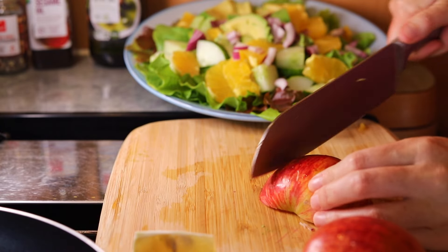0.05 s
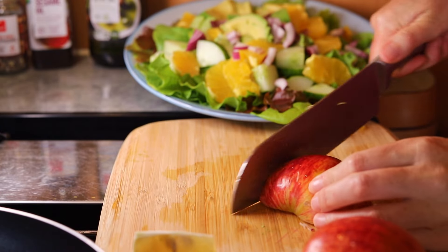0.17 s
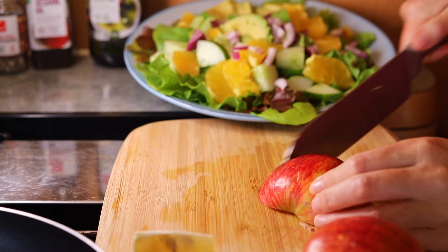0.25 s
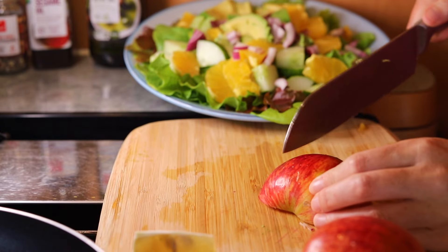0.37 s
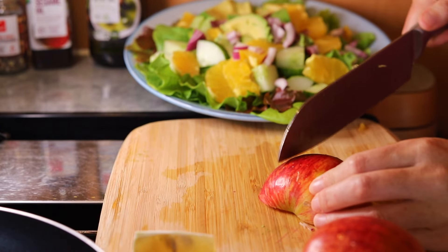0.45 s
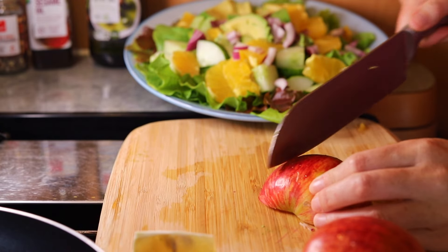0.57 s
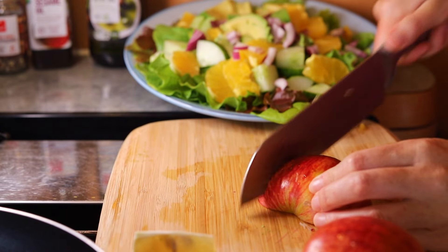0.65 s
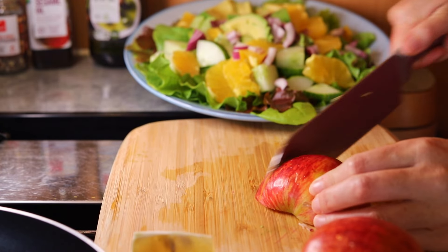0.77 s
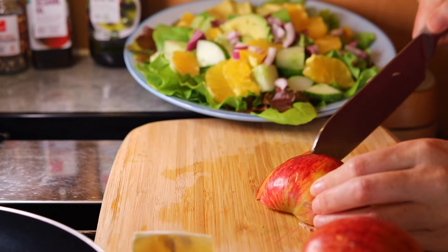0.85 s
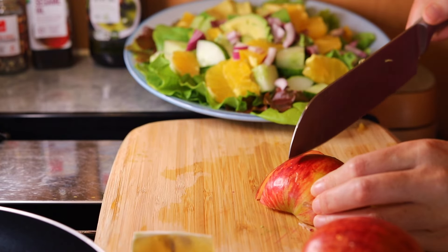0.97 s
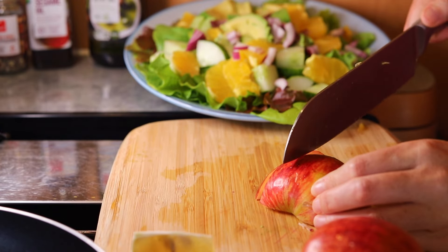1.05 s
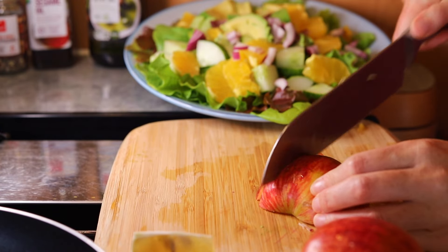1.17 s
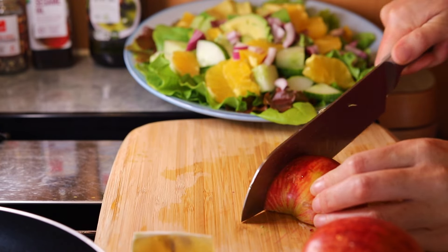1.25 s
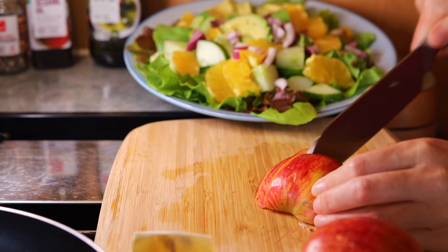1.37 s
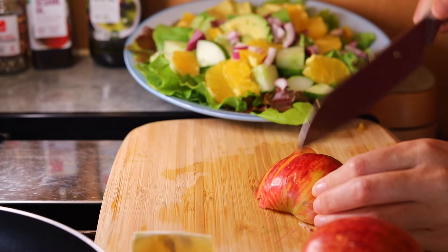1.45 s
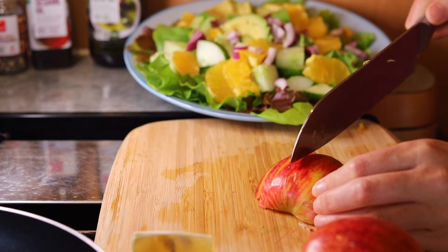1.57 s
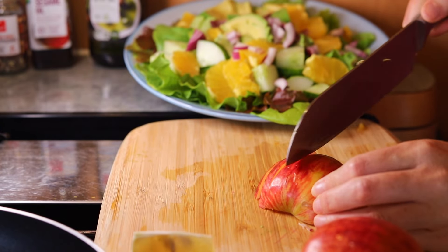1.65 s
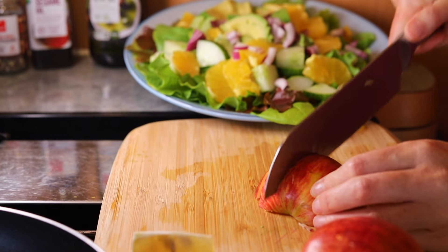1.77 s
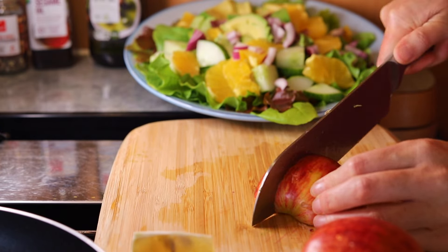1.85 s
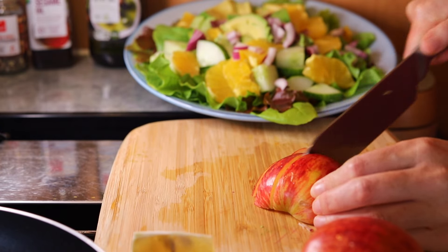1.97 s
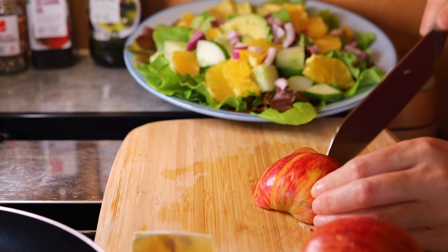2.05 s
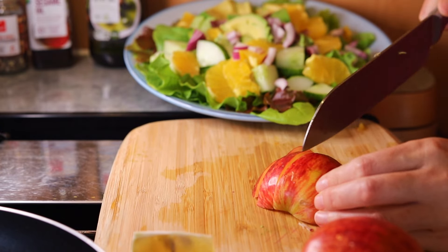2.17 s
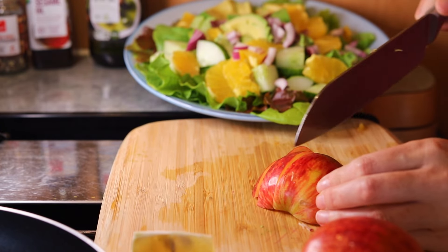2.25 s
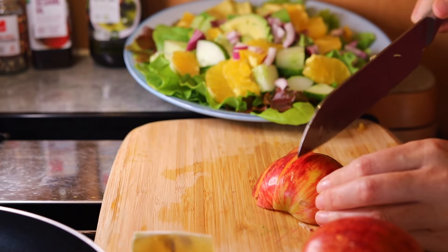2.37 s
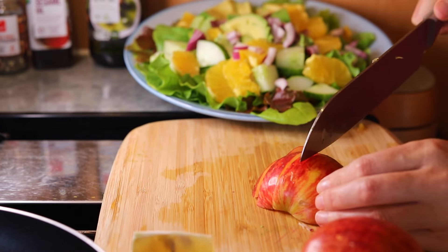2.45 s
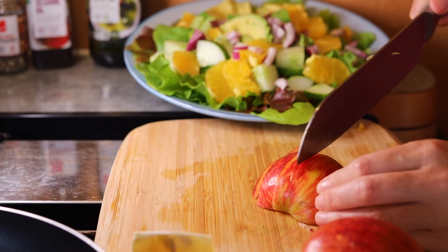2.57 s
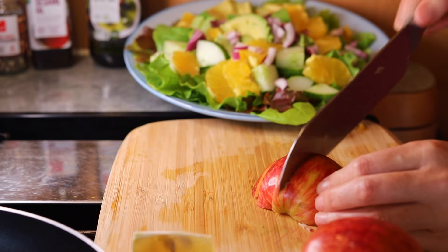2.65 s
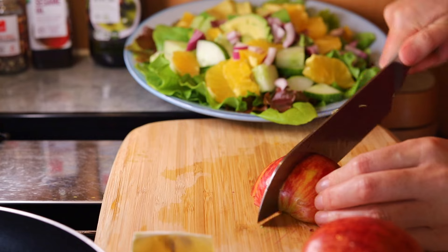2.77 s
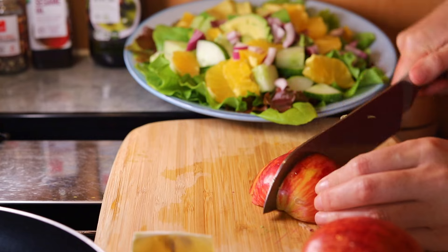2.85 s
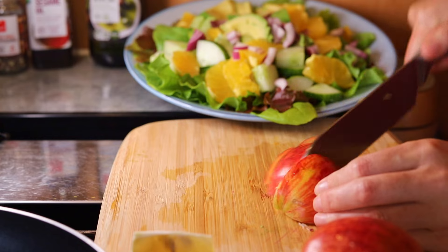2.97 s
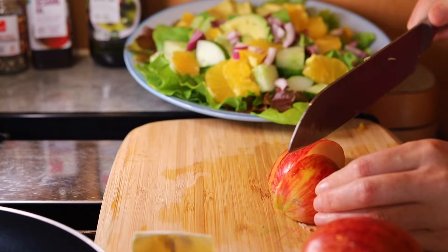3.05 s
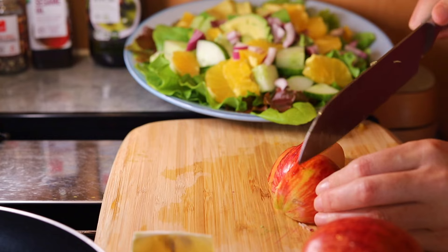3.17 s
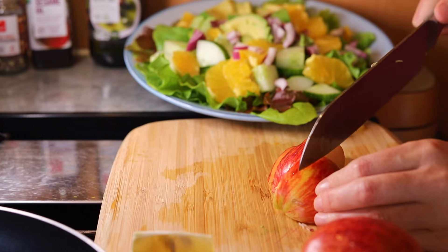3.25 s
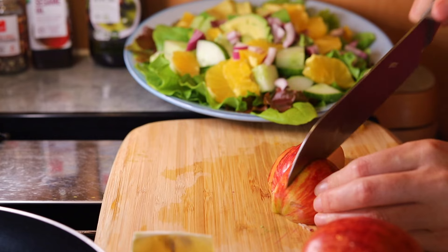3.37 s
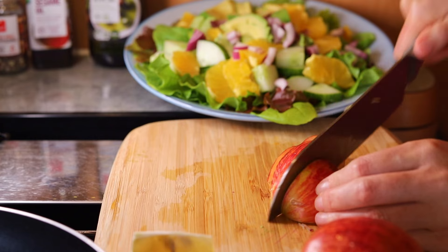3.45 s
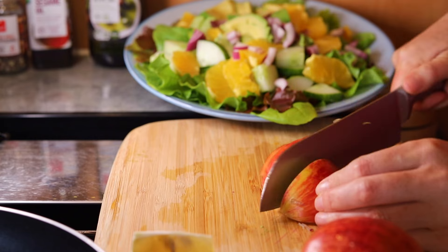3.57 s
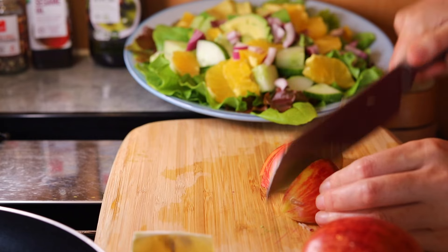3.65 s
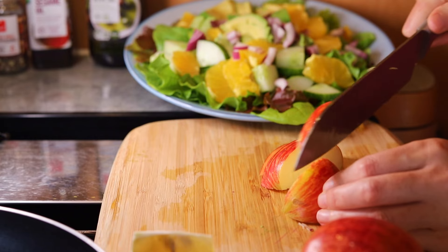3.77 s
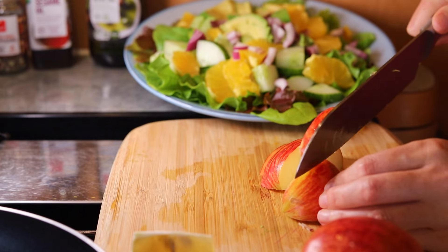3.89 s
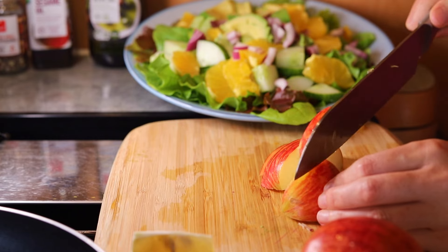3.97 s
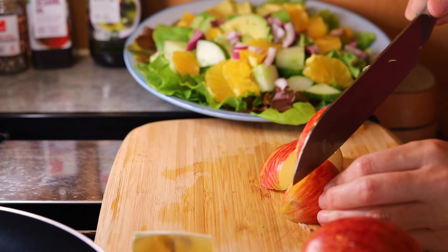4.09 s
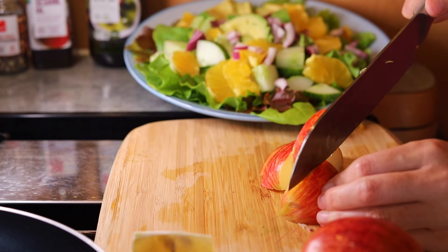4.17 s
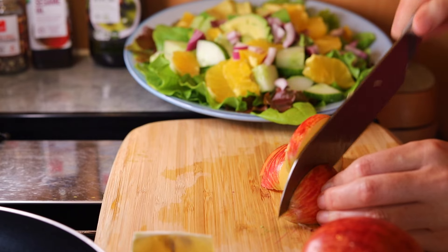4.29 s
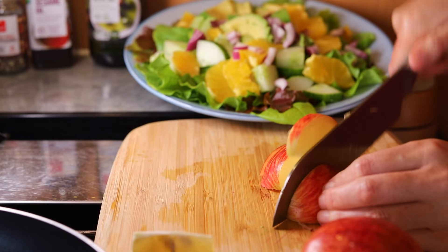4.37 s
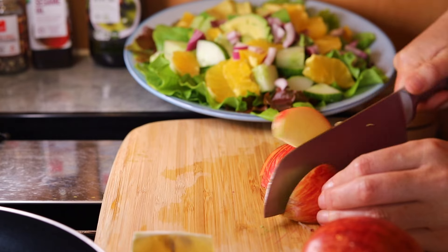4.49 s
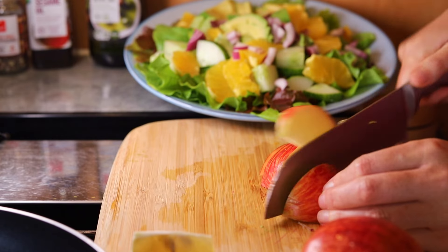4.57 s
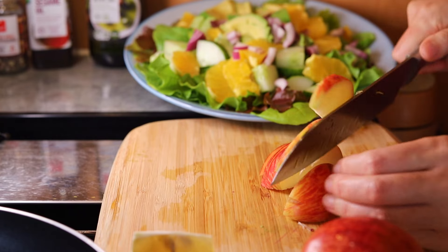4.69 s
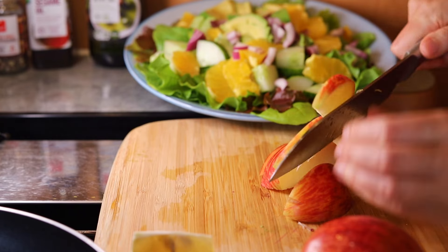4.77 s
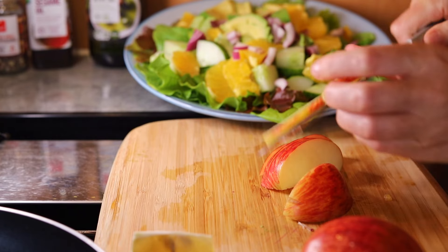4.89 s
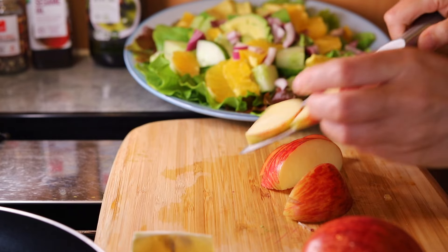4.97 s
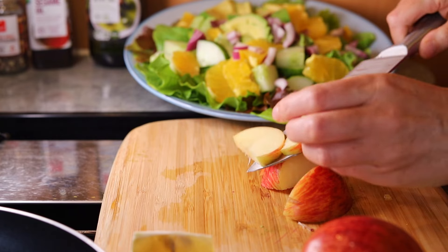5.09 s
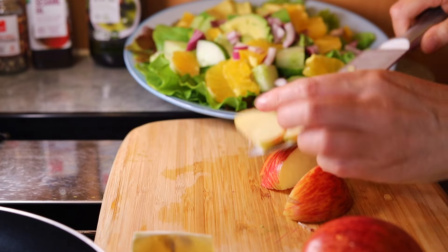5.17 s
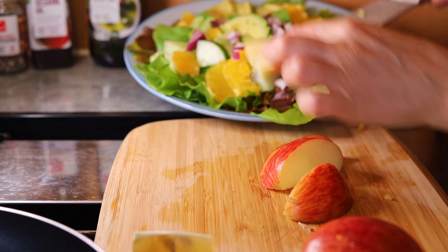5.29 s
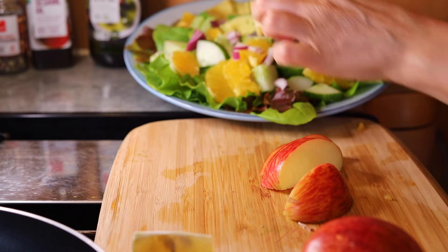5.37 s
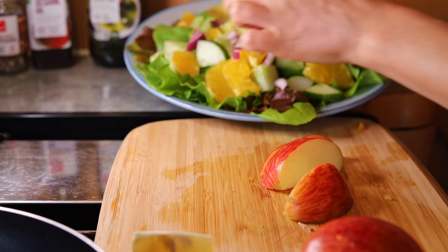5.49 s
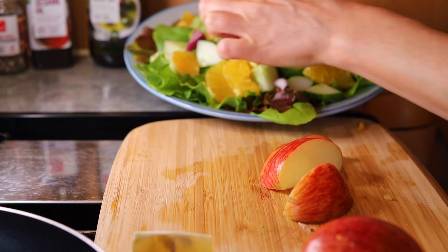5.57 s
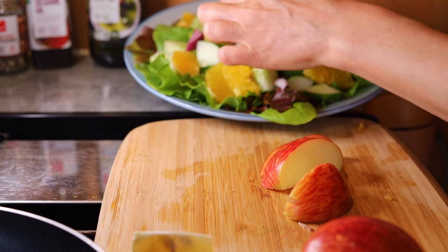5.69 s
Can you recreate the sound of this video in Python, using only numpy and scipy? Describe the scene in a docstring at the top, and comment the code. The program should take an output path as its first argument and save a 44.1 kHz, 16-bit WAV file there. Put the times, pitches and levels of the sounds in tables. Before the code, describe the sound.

A knife cuts an apple into wedges on a wooden board in a small kitchen, heard close up in stereo. Seven unhurried strokes each begin with a short, juicy crunch and end in a sharp wooden knock. The blade then scrapes back, sometimes squeaking in the skin. Light taps fall between the cuts, the steel rings faintly twice, and one last tap ends it over a low hum and hiss.

```python
"""A knife cuts an apple into wedges on a wooden board: seven close strokes in a small kitchen, in stereo.
First there is only a low hum and hiss. Then the blade crunches down, bursting cells and tearing skin,
and knocks on the board; the counter rumbles and the room answers. Next it is pulled back, scraping the
wood and sometimes squeaking in the skin. Between strokes it taps the fruit, and twice it rings faintly.
One last light tap ends the scene."""
import sys
import numpy as np
from scipy import signal
from scipy.fft import rfft, irfft, next_fast_len
from scipy.io import wavfile
from scipy.ndimage import map_coordinates

SR = 44100
rng = np.random.default_rng(int(sys.argv[2]) if len(sys.argv) > 2 else 0)


def waveform_to_disk(signal):
    """Save audio, clipped to [-1, 1], as 16-bit WAV at the path in sys.argv[1]."""
    frames = np.transpose(np.atleast_2d(signal))
    scaled = np.clip(frames, -1, 1) * 32767
    samples = np.round(scaled).astype(np.int16)
    wavfile.write(sys.argv[1], SR, samples)


N = 252693


def amp(db):
    """Turn decibels into a gain."""
    return 10 ** (np.asarray(db) / 20)


def unit(x):
    """Scale a sound to an average (rms) strength of 1."""
    return x / np.sqrt(np.mean(x ** 2) + 1e-20)


def along(points, hz):
    """Read between a table's rows on a log pitch scale."""
    pitches, values = np.transpose(points)
    return np.interp(np.log(hz + 1), np.log(pitches), values)


def pan(db):
    """Two gains that put the left db above the right."""
    return amp(np.array([[db], [-db]]) / 2)


def add(track, s, sound):
    """Mix a sound into a track at s seconds."""
    part = track[..., round(s * SR):][..., :sound.shape[-1]]
    part += sound[..., :part.shape[-1]]


def filtered(x, response):
    """Turn each pitch up or down by response(hz)."""
    size = next_fast_len(N + 8192)
    return irfft(rfft(x, size) * response(np.fft.rfftfreq(size, 1 / SR)), size)[..., :N]


def wobble(rate):
    """A smooth curve through rate random points a second."""
    return map_coordinates(rng.standard_normal(int(N * rate / SR) + 4), [np.arange(N) * rate / SR])


def grains(rate, spread_db):
    """Two streams of tiny random snaps, rate a second."""
    snaps = (rng.random((2, N)) < rate / SR) * rng.standard_normal((2, N))
    return snaps * amp(spread_db * rng.standard_normal((2, N)))


# how alike left and right are: (pitch [Hz], likeness [1 = the same])
LIKENESS = [(60, .97), (700, .88), (1500, .55), (3000, .1), (5000, -.1), (15000, -.1)]
def stereo(pair, colour):
    """Blend two unrelated sounds into a left and right that are alike in the bass."""
    def blend(hz):
        turn = np.arccos(np.clip(along(LIKENESS, hz), -1, 1)) / 2
        return colour(hz) * np.array([np.cos(turn), np.sin(turn)])
    mid, side = filtered(pair, blend)
    return unit(np.array([mid + side, mid - side]))


def noise(tone):
    """Stereo noise shaped by a tone table."""
    return stereo(rng.standard_normal((2, N)), lambda hz: amp(along(tone, hz)))


def envelope(start, end, rise, slope, fall):
    """A gain that rises until start, drifts until end, then falls (all in dB per second)."""
    knee_s = 0.0046  # the hand never changes pace at once
    gain = np.zeros(N)
    near = np.arange(max(round(start * SR) - SR // 4, 0), min(round(end * SR) + SR // 4, N))
    t = near / SR
    past = lambda x: knee_s * np.logaddexp(0, x / knee_s)
    drift_db = slope * (np.clip(t, start, end) - start)
    gain[near] = amp(drift_db - rise * past(start - t) - fall * past(t - end))
    return gain


# the quiet kitchen's hiss: (pitch [Hz], relative level [dB])
HISS_TONE = [(20, -20.5), (45, -14), (70, -5.5), (100, -13.5), (135, -21), (250, -17.5), (600, -21.5),
             (1100, -25), (1600, -23), (2000, -17), (3500, -16.5), (6800, -19.5), (10000, -25),
             (15700, -33.5)]
def background():
    """An appliance hums over a steady hiss."""
    phase = 2 * np.pi * 69.5 * np.arange(N) / SR + 0.37 * wobble(rate=4)
    hum = unit(np.sin(phase) * amp(1.1 * wobble(rate=4.1)))
    return amp(-76) * hum + amp(-68) * noise(HISS_TONE)


# the blade sinks through the apple:
# (skin splits [s], tip meets wood [s], blade stops [s], fizz [dB], skin [dB], wood [dB], surge [dB])
DOWN_STROKES = [(0.161, 0.172, .193, -47, -45, -46, 4), (0.711, 0.74, 0.74, -46.5, -46.5, -44.5, 3.5),
                (1.227, 1.276, 1.328, -49, -52, -48.5, 7.5), (1.794, 1.899, 1.915, -51, -52, -50.5, 9),
                (2.712, 2.743, 2.795, -49, -52.5, -57, 0), (3.435, 3.476, 3.521, -48, -55, -51.5, 8.5),
                (4.184, 4.186, 4.214, -62, -66.5, -70.5, 1.5),
                (4.298, 4.312, 4.389, -49.5, -53.5, -52, 10.5)]
def down_strokes():
    """Fizz, skin and wood gains going down: a bite, a crunch, a surge as the last flesh snaps."""
    t, gains = np.arange(N) / SR, np.zeros((3, N))
    surge_s, stop_db_per_s = .018, 900.5
    for bite, scrape, end, fizz_db, skin_db, wood_db, surge_db in DOWN_STROKES:
        surge = np.exp(-np.abs(t - end) / surge_s)
        fizz = envelope(bite, end, rise=400.5, slope=0, fall=stop_db_per_s)
        skin = envelope(bite, end, rise=339.5, slope=-24, fall=stop_db_per_s)  # split skin tears easily
        wood = envelope(scrape, end, rise=419, slope=89.5, fall=stop_db_per_s)  # the tip presses harder
        gains[0] += amp(fizz_db + surge_db * surge) * fizz
        gains[1] += amp(skin_db + surge_db * surge) * skin
        gains[2] += amp(wood_db + 5.5 * surge) * wood  # it digs in just before the knock
    return gains


# the juicy fizz: (pitch [Hz], relative level [dB])
FIZZ_TONE = [(100, -14.5), (400, -17.5), (900, -16), (2000, -5), (4000, 1), (6300, 0.5), (8000, -5),
             (12000, -10.5), (16000, -16.5)]
def bursting_cells():
    """The apple's cells burst in a dense fizz."""
    return stereo(grains(rate=23000, spread_db=2.5), lambda hz: amp(along(FIZZ_TONE, hz)))


# the tearing skin: (pitch [Hz], relative level [dB])
SKIN_TONE = [(100, -44.5), (500, -24.5), (900, -9.5), (1200, -3.5), (1700, -1), (2600, 2.5), (3400, -3),
             (5000, -8), (12000, -26)]
# pitches the blade boosts: (pitch [Hz], width [Hz], strength [dB])
BLADE_PEAKS = [(1180, 30, 6.7), (1450, 50, 5.3), (2010, 90, 1.3), (2496, 42, 6.5), (2720, 98, 5.1),
               (2960, 110, 4.7), (3140, 60, 12), (3600, 150, 4), (4306, 35, 15), (5530, 70, 9.6),
               (6060, 130, 9.6)]
def tearing_skin():
    """The skin tears in tiny snaps, coloured by the steel."""
    def colour(hz):
        peaks = sum(amp(2 * db) / (1 + (2 * (hz - pitch) / width) ** 2)
                    for pitch, width, db in BLADE_PEAKS)
        return amp(along(SKIN_TONE, hz)) * np.sqrt(1 + peaks)
    return stereo(grains(rate=11000, spread_db=1.07), colour)


# the kitchen's echo: (pitch [Hz], time to fade by 60 dB [s])
ECHO_FADES = [(100, 0.67), (600, 0.24), (2500, .25), (12000, 0.093)]
def room(x, delay_s):
    """The room answers with a blur of echoes; each pitch dies at its own speed."""
    hz, t, spectrum = signal.stft(rng.standard_normal((2, SR // 2)), SR, nperseg=256)
    fade = amp(-60 * t / along(ECHO_FADES, hz)[:, None])
    tail = signal.istft(spectrum * fade, SR, nperseg=256)[1]
    tail = np.pad(unit(tail) / np.sqrt(tail.shape[1]), ((0, 0), (round(delay_s * SR), 0)))
    return signal.fftconvolve(x, tail, axes=1)[:, :N]


def thinned(x, cut_hz=360):
    """Air slips round the small board, so it gives off little bass."""
    return signal.sosfilt(signal.butter(4, cut_hz, "high", fs=SR, output="sos"), x)


# the board's own notes: (pitch [Hz], time to fade by 60 dB [s], level [dB], left minus right [dB])
BOARD_NOTES = [(409.7, 0.06, -16.5, 0.5), (552, 0.13, -22, 1), (673.8, .035, 0.5, 2),
               (719.4, 0.017, 6.5, 6), (840, 0.035, -4.5, -5), (955, 0.028, -18.5, 3),
               (1114, 0.01, -17, -0.5), (1201, .04, -11, -1.5), (1405, 0.0074, -9.5, 0.5),
               (1522, 0.044, -10.5, -3), (1746, 0.054, -24, -5.5), (2074, .02, -10, -15),
               (2270, 0.03, -14.5, -6.5), (2690, .018, -16.5, -4), (3160, 0.045, -19.5, -0.5)]
def board(force, vary_db=0):
    """A push makes the board ring; where it lands changes how strong the high notes are."""
    t = np.arange(SR // 6) / SR
    ring = np.zeros((2, len(t)))
    for hz, fade_s, db, side in BOARD_NOTES:
        spot_db = vary_db * np.clip(hz / 800 - 1, 0, 1) * rng.standard_normal()
        swell = 1 - np.exp(-t / (0.0022 * (650 / hz) ** 2))  # slow, low waves fill the board later
        ring += pan(side) * amp(db + spot_db - 60 * t / fade_s) * swell * np.sin(2 * np.pi * hz * t)
    return signal.fftconvolve(force[None], thinned(ring), axes=1)[:, :N]


def scraping_wood(slip_hz=720):
    """The edge sticks and slips unevenly, at a rate near the board's main notes."""
    cycles = np.floor(np.cumsum(slip_hz * amp(2.3 * wobble(rate=600))) / SR)
    slips = np.diff(cycles, prepend=0) * amp(2.2 * wobble(rate=400))
    soft_slips = filtered(slips, lambda hz: 1 / (1 + (hz / 1100) ** 4))
    return unit(board(soft_slips))


# the crack of a knock: (pitch [Hz], relative level [dB])
CRACK_TONE = [(60, -46), (250, -28.5), (450, -12), (900, 8.5), (1500, 7), (2600, 0), (4000, -11.5),
              (7000, -18.5), (16000, -37)]
# the tip lands, the edge slaps down, the knife rocks:
# (time [s], tip [dB], tip hardness [Hz], edge delay [s], edge [dB], edge hardness [Hz], rocking [dB])
KNOCKS = [(0.1939, -24.5, 2200, .0033, -17, 1700, -17.5), (0.7522, -14, 3100, .0017, -18, 1840, -39),
          (1.3221, -22, 2402, .0017, -17, 1200, -35), (1.9044, -28.5, 1800, .0017, -16, 1500, -24),
          (1.9672, -29, 2150, 0.003, -10, 770, -46), (2.7890, -20.5, 1200, 0.005, -16.5, 1500, -27),
          (2.8722, -12.5, 3526, 0.0018, -20.5, 2030, -47), (3.5259, -21, 2320, .0034, -11, 1003, -54),
          (4.3952, -36.5, 2500, 0.0033, -9, 778, -48)]
def knocks():
    """Each contact is a short push on the board; harder ones are shorter and crack more."""
    wood, crack, t = np.zeros((2, N)), np.zeros(N), np.arange(SR // 8) / SR
    for start, tip_db, tip_hz, lag, edge_db, edge_hz, rock_db in KNOCKS:
        contacts = [(start - .0045, -31.5, 2200),  # a light graze comes first
                    (start, tip_db, tip_hz),
                    (start + lag, edge_db, edge_hz),
                    (start + lag + .009, rock_db, 1000)]
        for s, db, hard_hz in contacts:
            age = 2 * np.pi * hard_hz * t
            push = age * np.exp(-age)
            add(wood, s, board(amp(db) * push / push.sum(), vary_db=2))
            add(crack, s, amp(db) * hard_hz / 2500 * amp(-60 * t / 0.027))
    return amp(-2) * wood + amp(-11.5) * thinned(crack * noise(CRACK_TONE)) * pan(-3)


# the counter's rumble: (pitch [Hz], relative level [dB])
RUMBLE_TONE = [(25, -8), (60, -2.5), (100, -1.5), (160, -4.5), (300, 0.5), (450, -2), (800, -13),
               (3000, -41)]
def counter_rumble(blows):
    """The counter rumbles briefly under every blow."""
    linger = 0.015 * SR
    jolt = np.sqrt(signal.lfilter([1], [1, -np.exp(-1 / linger)], blows[0] ** 2) / linger)
    return jolt * noise(RUMBLE_TONE)


# the blade is pulled along the cut: (start [s], lifts out [s], fizz [dB], skin [dB], wood [dB])
BACK_STROKES = [(0.259, 0.361, -50, -47, -44), (0.804, 0.91, -50, -48.5, -46.5),
                (1.363, 1.463, -50, -47.5, -49), (1.975, 2.105, -52.5, -50.5, -52),
                (2.82, 2.841, -55, -55.5, -46), (2.888, 2.924, -55.5, -55, -51.5),
                (3.002, 3.046, -57, -50, -50.5), (3.554, 3.624, -51, -52.5, -52),
                (4.429, 4.49, -43.5, -48.5, -46)]
def back_strokes():
    """Fizz, skin and wood gains going back: less steel in the fruit, more scraping on the wood."""
    gains = np.zeros((3, N))
    grab_db_per_s = 849.5
    for start, end, fizz_db, skin_db, wood_db in BACK_STROKES:
        gains[0] += amp(fizz_db) * envelope(start, end, grab_db_per_s, slope=-55, fall=479.5)
        gains[1] += amp(skin_db) * envelope(start, end, grab_db_per_s, slope=-44.5, fall=479.5)
        gains[2] += amp(wood_db) * envelope(start, end, grab_db_per_s, slope=15, fall=620.5)
    return gains


# the edge catches the wood: (time [s], level [dB], half length [s])
CATCHES = [(0.304, -44, 0.0073), (0.346, -41, 0.005), (0.853, -39, 0.014), (0.887, -37, 0.0083),
           (1.407, -38.5, 0.011), (1.442, -38, 0.012), (1.950, -47, 0.016), (2.088, -49.5, 0.014)]
def judder():
    """Extra scraping gain each time the pulled edge catches."""
    t = np.arange(N) / SR
    return sum(amp(db) * np.exp(-((t - s) / half) ** 2) for s, db, half in CATCHES)


# steel squeaks in the skin: (time [s], pitch [Hz], relative level [dB], half length [s])
SKIN_SQUEAKS = [(0.312, 2490, -54.5, 0.018), (.825, 2480, -53, .025), (1.215, 2490, -59, .025),
                (1.803, 2480, -46.5, .014), (2.724, 2513, -53, 0.026), (4.463, 3270, -48, 0.0117),
                (4.455, 4340, -53.5, .02)]
def squeaks():
    """Sticking and slipping makes the blade sing one of its notes for a moment."""
    t, out = np.arange(N) / SR, np.zeros(N)
    drift = .8 * wobble(rate=120)
    for s, hz, db, half in SKIN_SQUEAKS:
        out += amp(db + 3.5) * np.exp(-((t - s) / half) ** 2) * np.sin(2 * np.pi * hz * t + drift)
    return out * amp(3.5 * wobble(rate=150)) * pan(-3.5)


TOP_HZ = 15830  # the highest pitch kept
# a tap's dull thud: (pitch [Hz], relative level [dB])
THUD_TONE = [(25, -17.5), (60, -6), (95, -0.5), (190, 2), (320, -11.5), (700, -20.5), (1500, -51),
             (6000, -58)]
# the blade touches the fruit or lets go of a slice:
# (time [s], tick [dB], tick pitch [Hz], time for the tick to fade by 60 dB [s], thud [dB])
TAPS = [(.432, -56, 4000, 0.065, -85), (.538, -47.5, 2110, 0.025, -57), (1.074, -62, 2540, 0.056, -62),
        (1.526, -48, 4800, 0.056, -80), (1.636, -45, 2370, 0.041, -49.5), (1.974, -39.5, 4900, 0.08, -86.5),
        (2.17, -51.5, 4900, 0.11, -100.5), (2.504, -53.5, 2180, 0.054, -55.5),
        (3.094, -50, 12150, 0.036, -85.5), (3.270, -48.5, 3380, 0.039, -55.5),
        (3.771, -51.5, 3520, 0.049, -87.5), (3.920, -57, 3610, .05, -60.5),
        (4.173, -50.5, 1990, 0.051, -73.5), (4.564, -46.5, 2540, 0.061, -80),
        (4.633, -41.5, 3040, 0.044, -76), (5.694, -48, 2490, 0.037, -80)]
def taps(thud_fade_s=.14):
    """A light touch ticks, and thuds through the fruit into the counter."""
    ticks, thud, t = np.zeros((2, N)), np.zeros(N), np.arange(SR // 2) / SR
    for s, tick_db, tick_hz, fade_s, thud_db in TAPS:
        band = signal.butter(2, [tick_hz * 0.38, min(tick_hz * 2, TOP_HZ)], "band", fs=SR, output="sos")
        tick = unit(signal.sosfilt(band, rng.standard_normal((2, len(t)))))
        add(ticks, s, amp(tick_db - 60 * t / fade_s) * (1 - np.exp(-t / 0.0043)) * tick * pan(-3))
        add(thud, s, amp(thud_db - 60 * t / thud_fade_s) * (1 - np.exp(-t / .005)))
    return ticks + thud * noise(THUD_TONE)


# the free blade's notes: (pitch [Hz], relative level [dB])
BLADE_NOTES = [(4630, -5), (5534, -10), (6094, -5), (6191, 0), (7203, -3), (10333, -8)]
# the blade slips free: (time [s], level [dB])
RELEASES = [(1.528, -64), (2.174, -64)]
def blade_rings(fade_s=0.16):
    """Out of the fruit, nothing muffles the steel, so it rings."""
    out, t = np.zeros((2, N)), np.arange(SR // 2) / SR
    for s, ring_db in RELEASES:
        for hz, db in BLADE_NOTES:
            note = np.sin(2 * np.pi * (hz * t + .3 * rng.random((2, 1))))
            add(out, s, amp(ring_db + db - 60 * t / fade_s) * note)
    return out


def scene():
    """Mix the knife's sounds, then add the room, the counter and the hum."""
    blows = knocks()
    fizz, skin, wood = down_strokes() + back_strokes()
    crunch = amp(3) * fizz * bursting_cells() * pan(-.3)
    crunch += amp(2.02) * skin * tearing_skin() * pan(-2.5)
    crunch *= amp(2.2 * wobble(rate=65))  # the flesh gives way in uneven jerks
    scrape = np.hypot(amp(-3.5) * wood, judder()) * scraping_wood()
    knife = blows + crunch + scrape + squeaks() + taps() + blade_rings()
    echo = amp(-17) * room(knife, delay_s=.006)
    return knife + echo + amp(-32.5) * counter_rumble(blows) + background()


def record(dry):
    """Remove everything above TOP_HZ."""
    return filtered(dry, lambda hz: hz < TOP_HZ)


dry = scene()
out = record(dry)
waveform_to_disk(out)
```